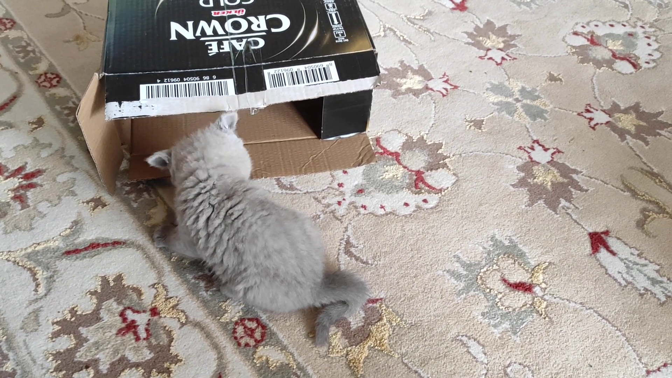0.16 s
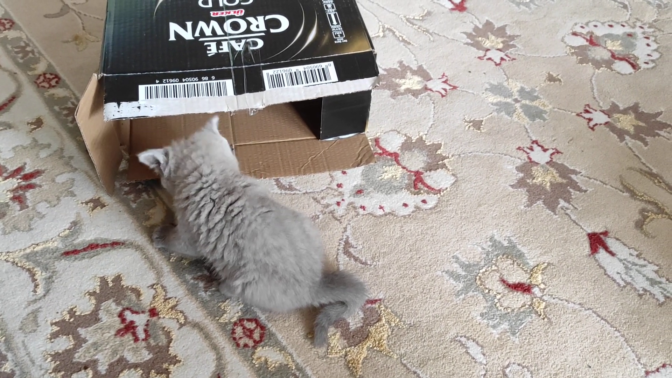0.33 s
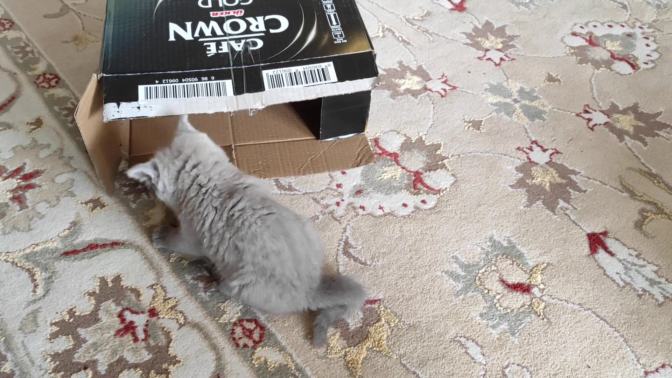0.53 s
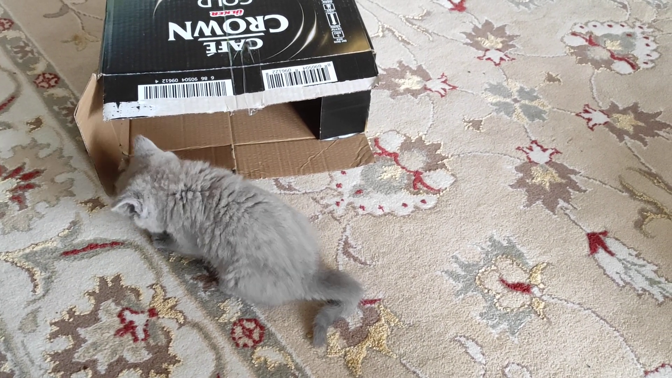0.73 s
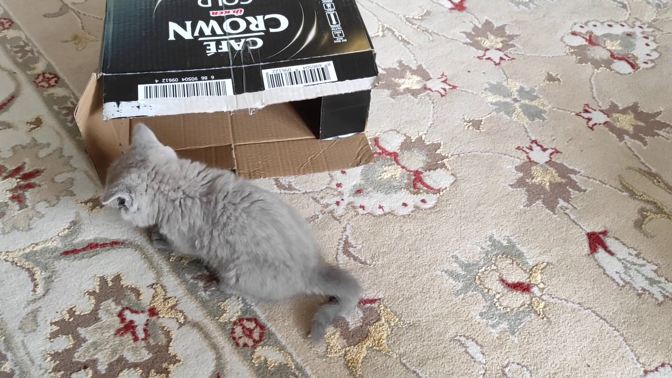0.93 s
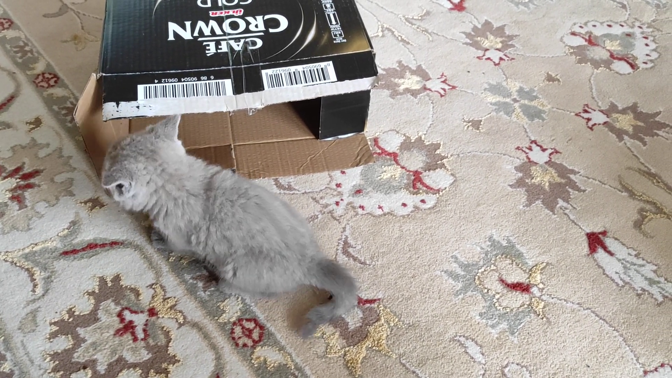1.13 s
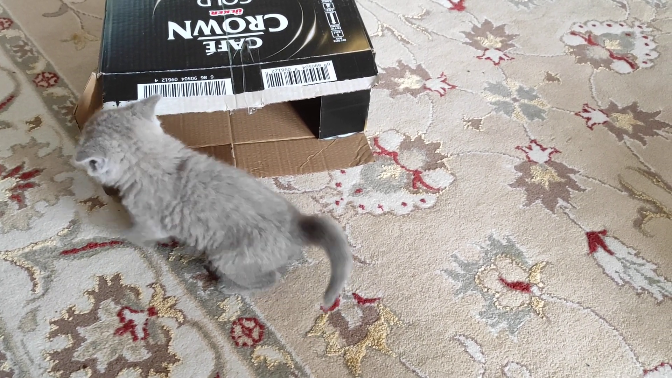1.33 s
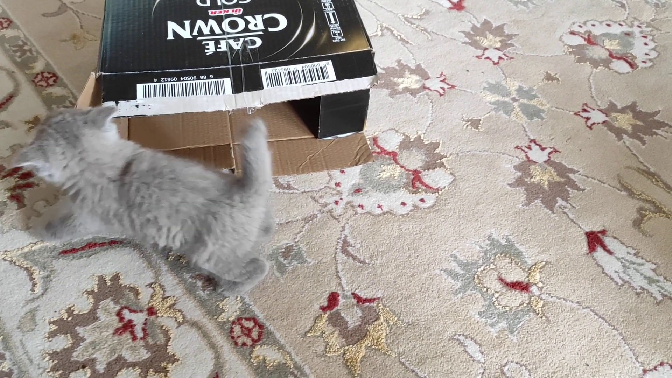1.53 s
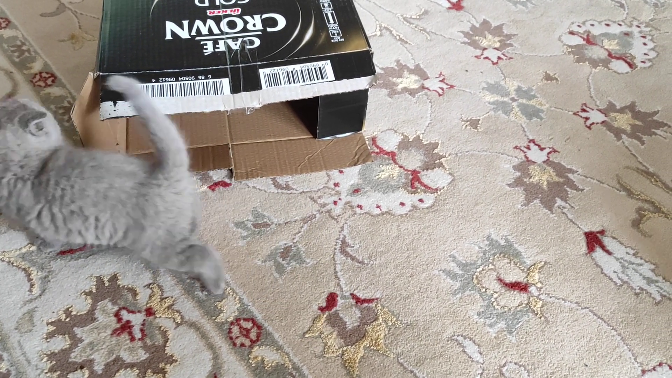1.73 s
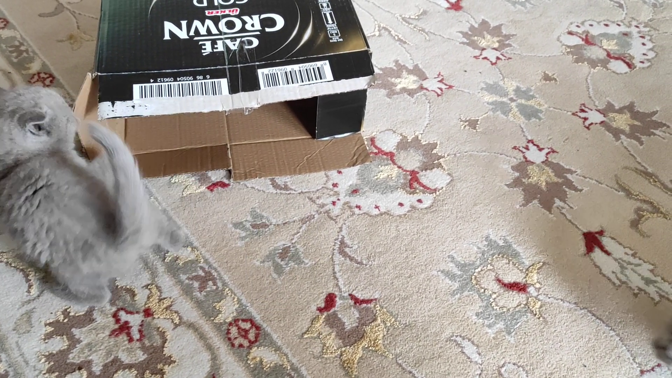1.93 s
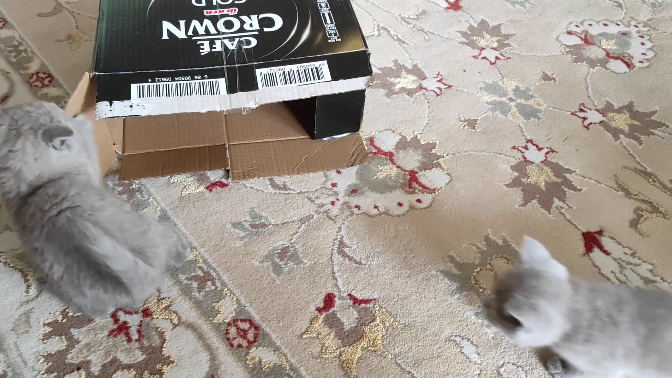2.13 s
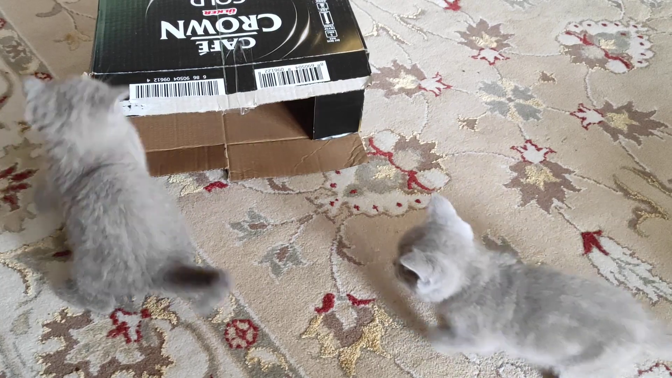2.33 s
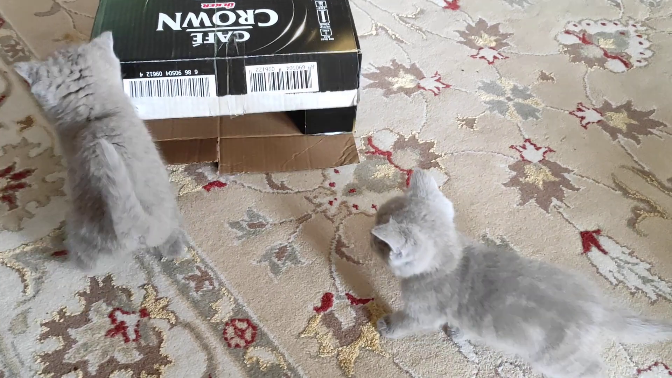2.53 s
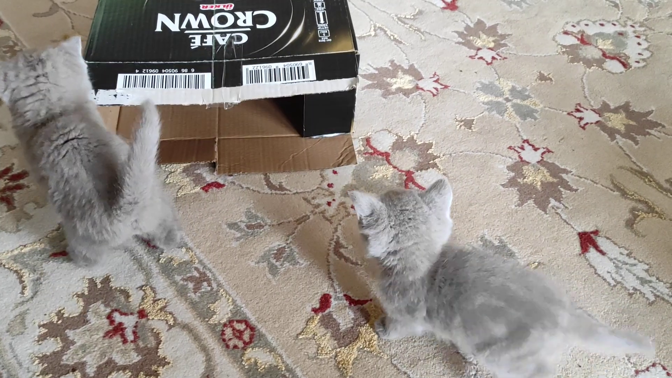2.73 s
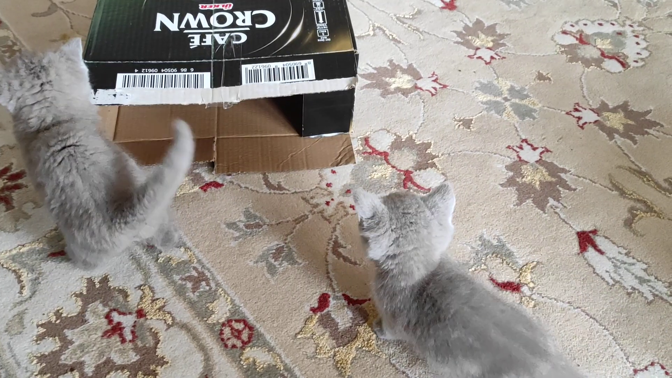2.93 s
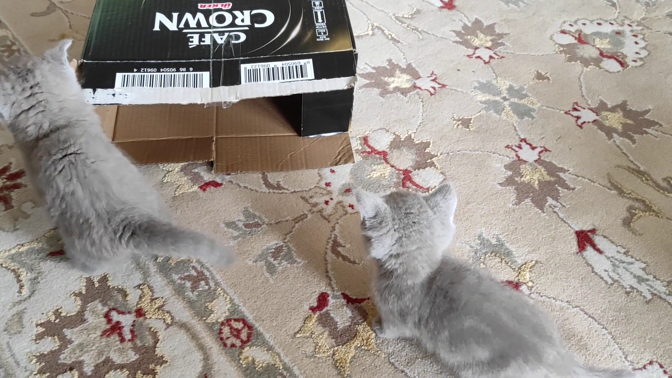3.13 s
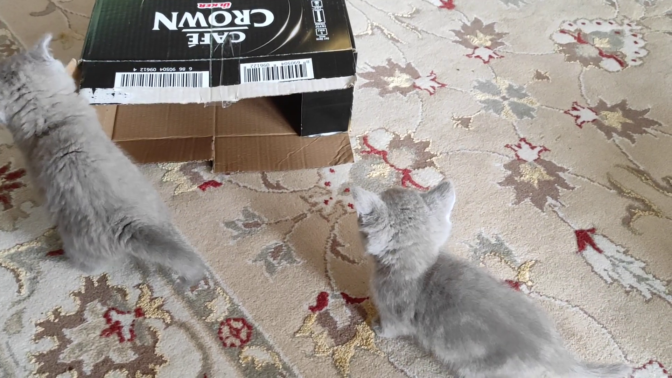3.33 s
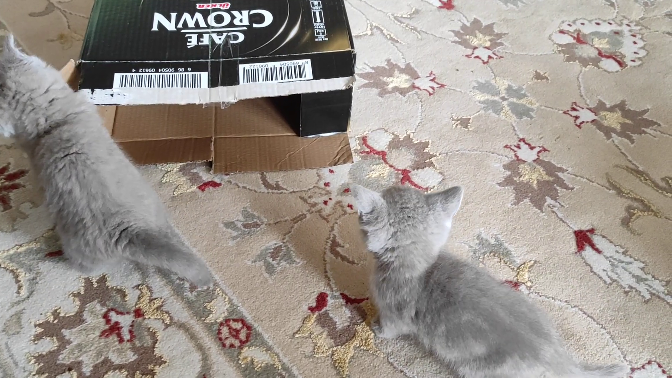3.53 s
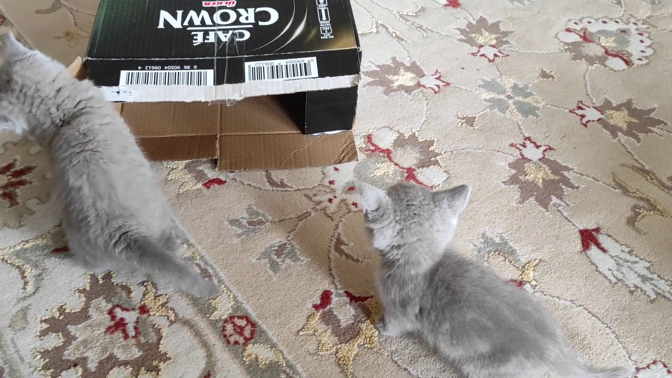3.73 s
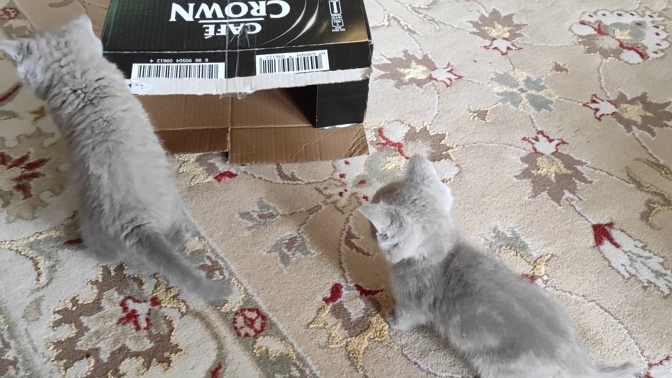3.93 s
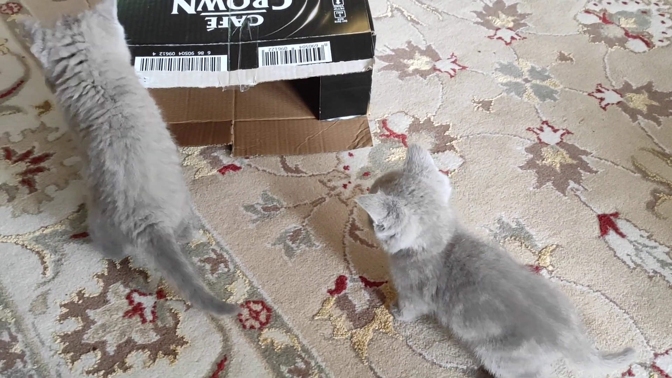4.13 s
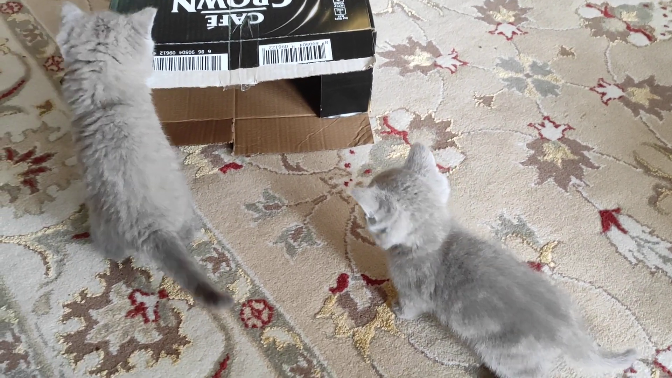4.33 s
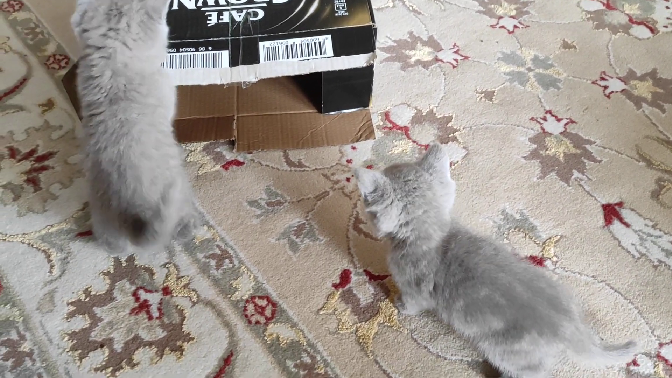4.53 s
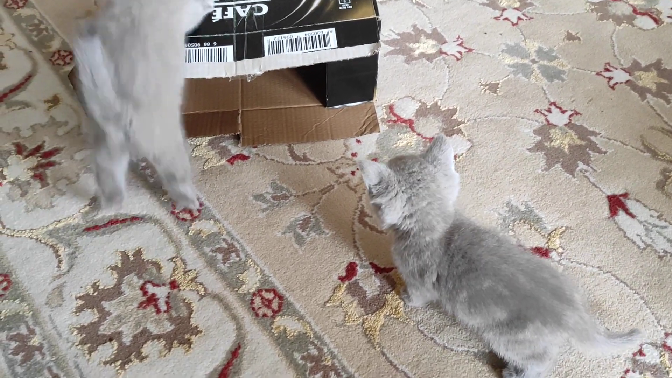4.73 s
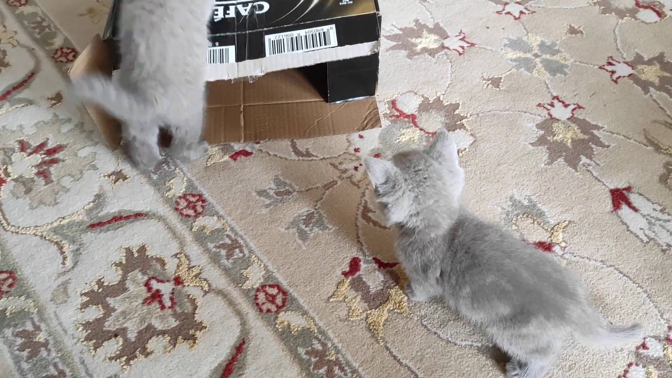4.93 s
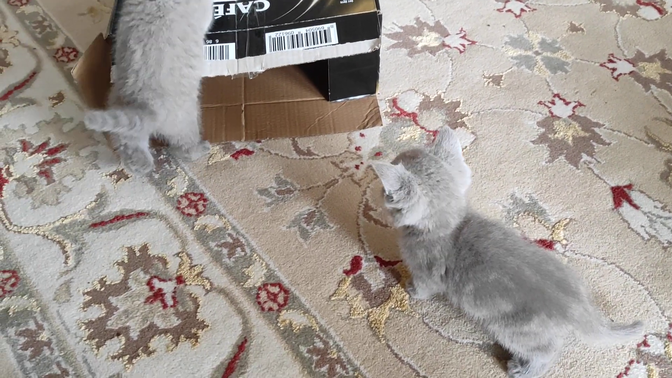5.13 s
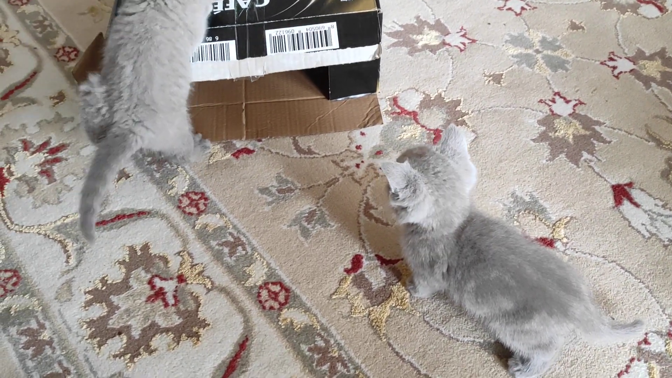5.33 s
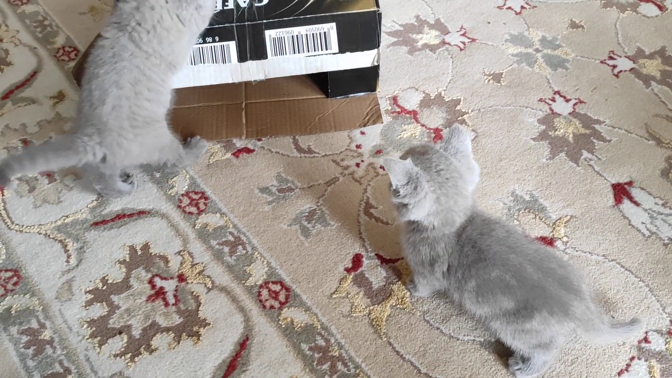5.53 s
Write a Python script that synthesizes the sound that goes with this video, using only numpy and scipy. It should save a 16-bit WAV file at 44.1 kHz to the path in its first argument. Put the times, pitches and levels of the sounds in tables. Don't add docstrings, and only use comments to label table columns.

```python
import sys
import numpy as np
from scipy import signal
from scipy.fft import rfft, irfft, next_fast_len
from scipy.io import wavfile

SR = 44100
rng = np.random.default_rng(int(sys.argv[2]) if len(sys.argv) > 2 else 0)


def volts(x):
    e = np.asarray(x, float) / 20
    return 10 ** e


def waveform_to_disk(signal):
    frames = np.transpose(np.atleast_2d(signal))
    scaled = np.clip(frames, -1, 1) * 32767
    samples = np.round(scaled).astype(np.int16)
    wavfile.write(sys.argv[1], SR, samples)


N = 245637
TIME = np.arange(N) / SR
LEFT_LATE_S = 0.00019


def rms_one(x):
    return x / np.sqrt(np.mean(x ** 2) + 1e-20)


def at_hz(points, hz, axis=1):
    points = np.array(points)
    return np.interp(np.log(hz + 1), np.log(points[:, 0] + 1), points[:, axis])


def coloured(x, spectrum, late_s=0):
    length = x.shape[-1]
    size = next_fast_len(length + 4096)
    hz = np.fft.rfftfreq(size, 1 / SR)
    delay = np.exp(-2j * np.pi * np.minimum(hz * late_s, 1))
    return irfft(rfft(x, size) * volts(at_hz(spectrum, hz)) * delay, size)[..., :length]


def lowpass(x, hz):
    return signal.sosfilt(signal.butter(4, hz, fs=SR, output="sos"), x)


def resonance(x, hz, width_hz):
    r = np.exp(-np.pi * width_hz / SR)
    zeros = np.array([1, 0, -1]) * (1 - r * r) / 2
    poles = [1, -2 * r * np.cos(2 * np.pi * hz / SR), r * r]
    return signal.lfilter(zeros, poles, x + 1e-18)


def modes(drive, table, hz=None, falloff_db=9.0):
    total = 0
    for k, (mode_hz, width_hz, level_db) in enumerate(table):
        if hz:
            level_db = level_db - falloff_db * abs(np.log2(mode_hz / hz))
        ring = resonance(drive, mode_hz, width_hz) / np.sqrt(width_hz)
        total = total + (-1) ** k * volts(level_db) * ring
    return total


def drift(rate_hz):
    r = np.exp(-2 * np.pi * rate_hz / SR)
    return rms_one(signal.lfilter([1], [1, -2 * r, r * r], rng.standard_normal(N + SR))[SR:])


def slips(per_s, spread_db, size=N):
    chance, strength, sign = rng.random((3, size))
    out = np.zeros(size)
    hit = chance < per_s / SR
    out[hit] = volts(-spread_db * np.log(strength[hit] + 0.00096)) * np.sign(sign[hit] - 0.5)
    return out


def contacts(rows, body, per_s, spread_db, rise_s, blow, wide=0):
    out, t = np.zeros((2, N)), TIME[:SR // 5]
    for start_s, peak_db, contact_s, *spot in rows:
        press = np.minimum(t / rise_s, 1) * np.exp(-(t / max(contact_s, 0.001)) ** 3)
        shared, *own = [slips(per_s, spread_db, size=SR // 3)[:len(t)] for _ in range(3)]
        drive = (shared + wide * np.array(own)) * press
        drive[:, round(rise_s * SR)] += blow
        sound = body(drive, *spot)
        sound = volts(peak_db) * sound / np.abs(sound).max()
        at = round(start_s * SR)
        out[:, at:at + len(t)] += sound[:, :N - at]
    return out


def lasting(rows, contact_s):
    return [(start_s, peak_db, contact_s, *spot) for start_s, peak_db, *spot in rows]


def pressure(rows, rise_db_per_s, fall_db_per_s):
    full_s, hold_s, *levels_db = np.transpose(rows)[..., None]
    early = np.maximum(full_s - TIME, 0)
    late = np.maximum(TIME - full_s - np.abs(hold_s), 0)
    slack_db = rise_db_per_s * early + fall_db_per_s * late
    return [volts(np.max(db - slack_db, axis=0)) for db in levels_db]


def box_walls(drive, hz=None):
    # mode_hz, width_hz, level_db
    wall_modes = [(80, 75, -33), (164, 20.5, 5.5), (200, 90, -0.5), (241, 77, -1), (271.8, 28, -2.5),
                  (345.6, 34, 1.5), (404, 135, -1), (483, 59, -7), (544, 79, -5.5)]
    soft = signal.lfilter(*signal.butter(2, 520, fs=SR), drive)
    sound = modes(soft, wall_modes, hz, falloff_db=6.5)
    if hz:
        sound = sound + volts(-11.0) * resonance(soft, hz, 40.5)
    return sound


def card_panels(drive, hz=None, upper_db=-5):
    # mode_hz, width_hz, level_db
    panel_modes = [(606, 630, 1), (883, 103, 1.5), (1080, 79, -1), (1260, 154, -0.5), (1600, 340, 0),
                   (2177, 110, -14.5), (2160, 340, -5.5), (2650, 300, -2)]
    large, small = modes(drive, panel_modes[:4]), modes(drive, panel_modes[4:])
    spot = volts(-8) * resonance(drive, hz, 0.08 * hz) if hz else 0
    return lowpass(large + volts(upper_db + 5.5) * small + spot, 3100)


def card_fibres(drive, hz=None, dull_db=-8):
    # freq_hz, density_db_per_hz
    fibre_spectrum = [(1200, -5.5), (2200, -4.5), (3000, -8), (3600, -8.5), (4800, -5.5), (5800, -6),
                      (7000, -2), (8500, 3.5), (9300, -0.5), (10000, -15.5), (10700, -20), (12200, -13.5),
                      (15300, -9), (16300, -50)]
    dull = lowpass(drive, 5500)
    bright = signal.sosfilt(signal.butter(4, 5500, "high", fs=SR, output="sos"), drive)
    if hz:
        bright = bright + volts(-8.0) * resonance(drive, hz, 720)
    return coloured(bright + volts(dull_db + 11.0) * dull, fibre_spectrum)


def card_edge(drive, hz):
    return resonance(resonance(drive, hz, 160), hz, 650)


def card_patch(drive, hz):
    width_hz = 0.11 * hz
    return resonance(resonance(drive, hz, width_hz), hz, 11.0 * width_hz)


def port_hiss():
    # freq_hz, density_db_per_hz
    hiss_spectrum = [(15, -2), (30, -18), (60, -12), (110, -21.5), (220, -19), (320, -23.5), (700, -28.5),
                     (1800, -36.5), (4500, -45), (7500, -40.5), (9000, -42.5), (10200, -50.5),
                     (12500, -46.5), (13200, -93)]
    # freq_hz, left_over_right_db
    hiss_balance = [(340, 6), (1500, 1), (5000, -1.5), (7100, -5), (8800, 3), (9700, -0.5)]
    noise = rng.standard_normal((3, N))
    noise[:2] += 0.72 * signal.lfilter(*signal.butter(1, 90, fs=SR), noise[2])
    both = rms_one(coloured(noise[:2], hiss_spectrum)) * volts(-62)
    left = coloured(both[0], [(hz, db / 2) for hz, db in hiss_balance])
    right = coloured(both[1], [(hz, -db / 2) for hz, db in hiss_balance])
    return np.array([left, right])


def room(x):
    # freq_hz, t60_s, level_db
    decay = [(84, 0.37, -5.5), (288, 0.45, -4.5), (1500, 0.27, -6.5), (4940, 0.18, -3.5),
             (12200, 0.24, -11.5)]
    first_echo_s = 0.0017
    t, tail = TIME[:SR // 2], 0
    for low_hz in 40 * 2. ** np.arange(9):
        octave = signal.butter(2, [low_hz, 2 * low_hz], "band", fs=SR, output="sos")
        band = signal.sosfilt(octave, rng.standard_normal((3, len(t))))
        alike = np.clip(1.05 - low_hz / 900, 0, 1)
        band = np.sqrt(alike) * band[2] + np.sqrt(1 - alike) * band[:2]
        mid_hz = low_hz * np.sqrt(2)
        t60_s = max(at_hz(decay, mid_hz), 0.05)
        fade_db = at_hz(decay, mid_hz, axis=2) - 60 * t / t60_s
        tail = tail + band * volts(fade_db) / np.sqrt(t60_s * SR / 14)
    tail = tail * np.clip(t / first_echo_s - 1, 0, 1)
    return signal.fftconvolve(x, tail, axes=1)[:, :N]


def leaning(grip):
    # full_weight_s, hold_s, wall_rumble_db, floor_shake_db
    lean_rows = [(1.97, 0.05, -65, -67), (2.13, 0.16, -56.5, -61.5), (2.48, 0.026, -48, -39),
                 (2.6, 0.01, -46, -69), (2.67, 0.072, -46, -49.5), (2.76, 0.165, -59, -63.5),
                 (3.02, 0.046, -54.5, -59.5), (3.29, 0.0069, -68, -66.5), (3.42, 0.025, -60, -66),
                 (3.6, 0.023, -50.5, -64), (3.7, 0.19, -66, -76), (4.04, 0.012, -48.5, -66),
                 (4.3, 0.073, -59.5, -68), (4.41, 0.0078, -44, -60), (4.58, 0.1, -63, -65),
                 (4.82, 0.069, -75, -47), (4.89, 0.056, -80, -66), (5.0, 0.0036, -46, -38.5),
                 (5.1, 0.29, -70.5, -76), (5.35, 0.09, -67, -84)]
    # mode_hz, width_hz, level_db
    board_modes = [(42.2, 12, -3), (75.8, 20, 0), (110.3, 22, -7)]
    rumble, shake = pressure(lean_rows, rise_db_per_s=353, fall_db_per_s=570)
    walls = rms_one(box_walls(slips(500, 4.44)))
    floor = rms_one(modes(rng.standard_normal(N), board_modes))
    return rumble * grip * walls + shake * floor


def rubbing(grip):
    # full_pressure_s, hold_s, fur_hiss_db, card_rasp_db
    rub_rows = [(1.97, 0.02, -68, -65.5), (2.14, 0.079, -65, -62), (2.25, 0.019, -54, -51),
                (2.49, 0.11, -56, -52), (2.6, 0.1, -51, -50.5), (2.72, 0.075, -61, -59.5),
                (3.01, 0.093, -62.5, -62.5), (3.29, 0.0039, -69.5, -101), (3.39, 0.3, -74.5, -71.5),
                (3.72, 0.0028, -63.5, -83), (3.81, 0.14, -74, -73.5), (4.04, 0.024, -59, -56),
                (4.13, 0.072, -76.5, -70.5), (4.41, 0.0089, -52, -48), (4.51, 0.26, -78.5, -77),
                (4.82, 0.059, -81, -82), (5.0, 0.0096, -52, -58), (5.05, 0.035, -60.5, -71),
                (5.14, 0.12, -72.5, -81), (5.29, 0.11, -57, -59), (5.36, 0.1, -52.5, -58),
                (5.49, 0.1, -48.5, -59.5)]
    hiss, rasp = pressure(rub_rows, rise_db_per_s=320, fall_db_per_s=390)
    own = np.array([slips(9000, 1.16), slips(9000, 2.17)])
    fur = rms_one(card_fibres(slips(9000, 0.83) + 3.7 * own))
    card = rms_one(card_panels(slips(2000, 4.6)))
    return hiss * grip * fur + rasp * grip * card


def rib_crunches():
    # start_s, peak_db, contact_s, pitch_hz
    crunch_rows = [(0.49, -63, 0.01, 2150), (0.499, -56.5, 0.027, 925), (0.54, -60, 0.027, 1730),
                   (0.661, -62, 0.004, 1020), (0.672, -83, 0.008, 553), (2.47, -44.5, 0.0078, 930),
                   (2.484, -42, 0.006, 200), (2.491, -33, 0.0083, 282), (2.503, -42, 0.004, 297),
                   (2.524, -36, 0.006, 412), (2.546, -46, 0.005, 1090), (2.563, -38, 0.0062, 2700),
                   (2.575, -45, 0.012, 2750), (2.588, -39, 0.0049, 1100), (2.601, -38, 0.006, 960),
                   (2.63, -38, 0.014, 910), (2.664, -47.5, 0.05, 1180), (2.692, -55, 0.012, 293),
                   (3.006, -50, 0.03, 910), (3.561, -46, 0.0048, 2000), (3.564, -49, 0.0095, 420),
                   (3.588, -51, 0.0091, 623), (3.615, -62, 0.0082, 850), (3.628, -50, 0.012, 2020),
                   (3.725, -60, 0.01, 1040), (4.004, -45, 0.0061, 570), (4.017, -41, 0.0027, 613),
                   (4.028, -44, 0.0053, 1880), (4.042, -51, 0.005, 890), (4.35, -55, 0.0036, 447),
                   (4.383, -37, 0.0072, 1080), (4.386, -35, 0.008, 2700), (4.396, -43, 0.0067, 262),
                   (4.41, -50, 0.0033, 285), (4.42, -53, 0.012, 1700), (4.619, -59, 0.003, 8900),
                   (4.694, -61, 0.011, 2880), (4.835, -26, 0.004, 258), (4.995, -41.5, 0.033, 324),
                   (5.003, -44, 0.024, 1080), (5.41, -45, 0.008, 2050), (2.75, -45, 0.0021, 330),
                   (2.8, -49, 0.0036, 1000), (2.664, -43.5, 0.0088, 127), (3.004, -49.5, 0.006, 420),
                   (3.022, -43.5, 0.0077, 554), (4.811, -44, 0.0076, 570), (4.692, -56, 0.044, 1600),
                   (4.7, -46.5, 0.033, 910)]
    return contacts(crunch_rows, card_patch, 1500, spread_db=4.5, rise_s=0.0011, blow=2.5, wide=0.44)


def claw_skates():
    # start_s, peak_db, contact_s, pitch_hz
    skate_rows = [(0.499, -57, 0.0032, 6960), (0.65, -59, 0.0034, 590), (0.657, -60.5, 0.036, 7500),
                  (0.904, -52, 0.0024, 545), (0.912, -59.5, 0.0052, 7000), (1.926, -66, 0.016, 320),
                  (1.926, -58, 0.01, 8200), (1.93, -53, 0.013, 1720), (1.979, -53.5, 0.008, 8800),
                  (2.025, -58.5, 0.047, 2000), (2.036, -58.5, 0.02, 8160), (2.115, -53, 0.01, 1000),
                  (2.157, -51, 0.006, 7600), (2.177, -58, 0.011, 535), (2.232, -39, 0.013, 7400),
                  (2.442, -42, 0.026, 8500), (2.452, -50, 0.005, 5840), (2.504, -34, 0.003, 534),
                  (2.545, -38, 0.055, 2520), (2.575, -39, 0.034, 5750), (2.589, -32, 0.0023, 8250),
                  (2.63, -44, 0.014, 1080), (2.64, -37, 0.006, 2400), (2.69, -54, 0.013, 2400),
                  (2.706, -36, 0.0023, 8800), (2.862, -51, 0.0065, 740), (2.979, -53, 0.013, 7350),
                  (3.015, -51, 0.044, 616), (3.037, -53, 0.004, 4900), (3.094, -60, 0.004, 4800),
                  (3.142, -54, 0.003, 3900), (3.155, -54.5, 0.028, 7260), (3.475, -60, 0.004, 2000),
                  (3.507, -62, 0.004, 720), (3.562, -54, 0.0023, 4700), (3.586, -44, 0.0092, 730),
                  (3.584, -43, 0.008, 2040), (3.765, -62, 0.008, 1300), (4.016, -33, 0.0047, 1500),
                  (4.12, -50, 0.015, 1060), (4.216, -68, 0.07, 1500), (4.226, -60, 0.08, 2560),
                  (4.33, -56, 0.029, 1600), (4.395, -41, 0.055, 1600), (4.408, -44, 0.025, 336),
                  (4.696, -38.5, 0.004, 7400), (0.495, -59, 0.044, 2420), (5.057, -49, 0.004, 12600),
                  (5.503, -48, 0.0093, 458), (5.544, -54, 0.013, 463), (4.345, -51, 0.035, 4420)]
    return contacts(skate_rows, card_patch, 4000, spread_db=4.5, rise_s=0.0016, blow=2.2, wide=0.79)


def edge_plucks():
    pluck_rows = lasting([(0.4788, -50.5, 1600), (1.1952, -62, 2700), (2.101, -47, 2640), (2.22, -37, 1320),
                          (2.9044, -49, 1770), (3.0969, -54.5, 2350), (3.5828, -42, 2030),
                          (4.0494, -49, 2720), (4.388, -40, 1680), (4.6944, -44.5, 1600),
                          (4.8304, -44, 2400)], contact_s=0.0035)
    sound = contacts(pluck_rows, card_edge, 2900, spread_db=-5.0, rise_s=0.00033, blow=0.7) * volts(-3.5)
    sound[0] = np.roll(sound[0], -round(LEFT_LATE_S * SR))
    return sound


def claw_ticks():
    tick_rows = lasting([(0.4988, -57.5, 8000, -9), (0.8492, -62, 5900, 2), (1.194, -60.5, 7500, 0),
                         (1.8746, -67.5, 9100, -21), (1.926, -63, 7710, -13), (2.099, -41.5, 9600, -14),
                         (2.156, -54, 8000, -10), (2.1853, -37, 9600, -40), (2.2197, -34.5, 7400, -2),
                         (2.4817, -34, 9500, -23), (2.5044, -38.5, 7110, 8), (2.6276, -35, 8810, -6),
                         (2.797, -39, 8400, -14), (2.9012, -44.5, 4500, 17), (3.1418, -55, 8200, -11),
                         (3.3474, -61.5, 7690, -10), (3.561, -45.5, 4700, -2), (3.583, -44, 8850, 3),
                         (3.714, -55, 9350, -12), (3.7611, -54, 8650, -9), (4.3111, -42, 7800, -11),
                         (4.3804, -44, 9100, -27), (4.5794, -58.5, 8950, -8), (4.6927, -42.5, 7950, -12),
                         (4.8088, -35.5, 8550, 0), (4.8293, -28.5, 8900, -1.5), (5.051, -57, 6800, -19)], contact_s=0.006)
    sound = contacts(tick_rows, card_fibres, 9000, spread_db=4.0, rise_s=0.00052, blow=1.1, wide=2.1)
    return lowpass(sound * volts(7.5), 11200)


def claw_strokes():
    # start_s, peak_db, contact_s, dull_part_db
    stroke_rows = [(0.6562, -62, 0.049, 0), (0.9097, -55, 0.051, 1.5), (1.925, -52, 0.047, -12),
                   (2.105, -48, 0.039, -9), (2.154, -44.5, 0.079, -11), (2.2243, -33, 0.029, 1),
                   (2.435, -45, 0.061, -13), (2.5075, -36, 0.044, 0), (2.5296, -29, 0.065, -10),
                   (2.569, -32, 0.028, 9), (2.695, -37, 0.0068, -13), (2.752, -44, 0.033, -14),
                   (2.868, -48, 0.074, -5), (3.009, -51, 0.022, -3), (3.1197, -50.5, 0.079, -10),
                   (3.4062, -52.5, 0.013, 6), (3.5866, -45, 0.067, -9), (4.0, -42.5, 0.036, -6),
                   (4.224, -50, 0.12, 20), (4.269, -48.5, 0.033, 25), (4.314, -39, 0.038, 2),
                   (4.377, -28.5, 0.017, -5), (4.6803, -47, 0.042, -12), (4.8178, -33, 0.024, 6),
                   (4.835, -36.5, 0.043, 7), (4.9586, -40.5, 0.036, -10), (4.9794, -43, 0.043, -31)]
    sharp_hz, hz_per_dull_db = 7740, -48
    rows = [(start_s, peak_db, contact_s, sharp_hz + hz_per_dull_db * dull_db, dull_db)
            for start_s, peak_db, contact_s, dull_db in stroke_rows]
    return contacts(rows, card_fibres, 9000, spread_db=3.5, rise_s=0.007, blow=0.34, wide=2.35) * volts(6.0)


def flap_drags():
    drag_rows = lasting([(0.494, -47, 1840, -16), (0.654, -57, 606, -7), (0.904, -56.5, 618, -19),
                         (2.222, -53, 540, -22), (2.509, -38, 930, -11), (2.56, -41, 1730, -15),
                         (2.597, -39.5, 905, -21), (2.873, -41.5, 596, 1), (3.007, -39, 644, -17),
                         (3.392, -56.5, 610, 7), (3.584, -43.5, 746, 2), (3.999, -39.5, 592, -7.5),
                         (4.232, -60, 2740, -7), (4.315, -47, 1450, 23), (4.39, -58, 1170, 6),
                         (4.686, -51, 1600, -24), (4.971, -42.5, 1080, -20)], contact_s=0.041)
    sound = contacts(drag_rows, card_panels, 3000, spread_db=5.0, rise_s=0.0014, blow=0.3, wide=0.47)
    return sound * volts(1.5)


def flap_knocks():
    # start_s, peak_db, pitch_hz, upper_panels_db
    knock_rows = [(0.478, -54, 1600, -11), (0.489, -48.5, 1675, 1), (0.904, -71, 640, -14),
                  (1.938, -54, 2000, 5), (2.099, -46.5, 947, -9), (2.189, -50, 490, -2),
                  (2.221, -39, 592, -1), (2.43, -38.5, 1080, 2), (2.469, -41, 483, -22),
                  (2.505, -41, 546, 7), (2.547, -41.5, 1080, -6), (2.689, -49, 636, -11),
                  (2.754, -49.5, 540, 1), (2.87, -52, 540, -11), (3.004, -47.5, 600, -4),
                  (3.348, -59.5, 907, -4), (3.507, -70, 716, -6), (3.562, -48.5, 804, 7),
                  (3.583, -45, 544, -8), (3.727, -63, 1070, 2), (3.907, -60, 1050, 4),
                  (4.015, -41, 1000, -1), (4.313, -44.5, 1370, 18), (4.383, -29.5, 1010, 22),
                  (4.696, -45.5, 943, -6), (4.81, -47, 530, -28), (4.975, -46, 516, -13)]
    contact_s, at_pitch_hz, shortening = 0.0091, 825, 0.069
    rows = [(start_s, peak_db, contact_s * (at_pitch_hz / hz) ** shortening, hz, upper_db)
            for start_s, peak_db, hz, upper_db in knock_rows]
    sound = contacts(rows, card_panels, 2500, spread_db=3.5, rise_s=0.000875, blow=2.5, wide=0.21)
    return sound * volts(6.5)


def paw_thumps():
    # start_s, peak_db, contact_s, strongest_wall_hz
    thump_rows = [(0.649, -60.5, 0.016, 583), (0.901, -56, 0.033, 432), (1.935, -54, 0.018, 257),
                  (2.102, -49, 0.026, 247), (2.179, -49, 0.036, 244), (2.228, -37, 0.011, 200),
                  (2.433, -29, 0.0079, 247), (2.453, -32, 0.0046, 152), (2.472, -40, 0.005, 200),
                  (2.494, -33, 0.052, 274), (2.528, -41.5, 0.026, 165), (2.667, -46, 0.0095, 76),
                  (2.762, -40.5, 0.018, 175), (2.869, -45, 0.02, 590), (3.002, -44.5, 0.013, 465),
                  (3.361, -60, 0.014, 157), (3.414, -56.5, 0.023, 251), (3.586, -43, 0.039, 293),
                  (3.889, -54, 0.067, 262), (4.014, -38, 0.0065, 367), (4.033, -44, 0.042, 174),
                  (4.306, -48.5, 0.011, 200), (4.388, -43, 0.011, 236), (4.693, -50, 0.021, 261),
                  (4.811, -28, 0.016, 271), (4.828, -31.5, 0.0037, 265), (4.864, -39.5, 0.013, 244),
                  (4.973, -32.5, 0.018, 232), (4.998, -37.5, 0.059, 146), (5.55, -37.5, 0.023, 480)]
    return contacts(thump_rows, box_walls, 400, spread_db=1.5, rise_s=0.002454, blow=4.25) * volts(2.0)


def scene():
    grip = volts(1.2 * drift(30))
    friction = rubbing(grip) + leaning(grip)
    claws = claw_ticks() + claw_strokes()
    flaps = flap_knocks() + flap_drags()
    box = (paw_thumps() + flaps + claws + friction) * volts(-1.0)
    return box + room(box) + edge_plucks() + claw_skates() + rib_crunches()


def roll_off(x):
    return signal.sosfilt(signal.butter(12, 15740, fs=SR, output="sos"), x)


def record(dry):
    # freq_hz, left_over_right_db
    port_balance = [(60, 5.5), (1700, 5), (2500, 2.5), (3100, -2), (4800, 4), (5600, 0), (6900, -14),
                    (7500, -8), (8500, 8), (9700, 8), (10900, -1), (15000, 1)]
    left = coloured(dry[0], [(hz, db / 2) for hz, db in port_balance], LEFT_LATE_S)
    right = coloured(dry[1], [(hz, -db / 2) for hz, db in port_balance])
    mix = np.array([left, right]) + port_hiss()
    return roll_off(mix)


dry = scene()
out = record(dry)
waveform_to_disk(out)
```